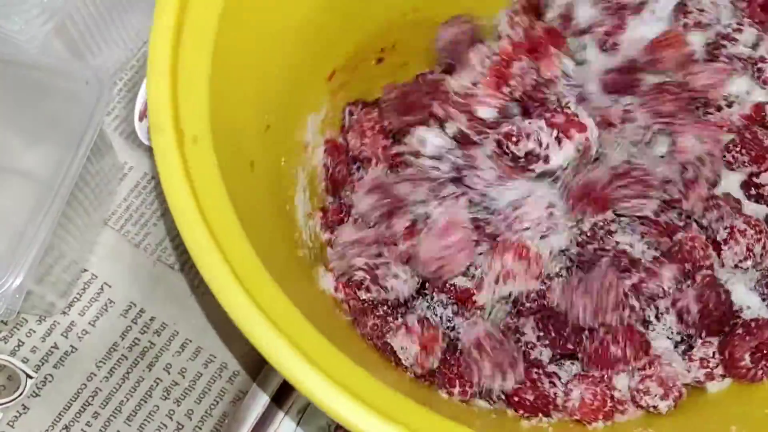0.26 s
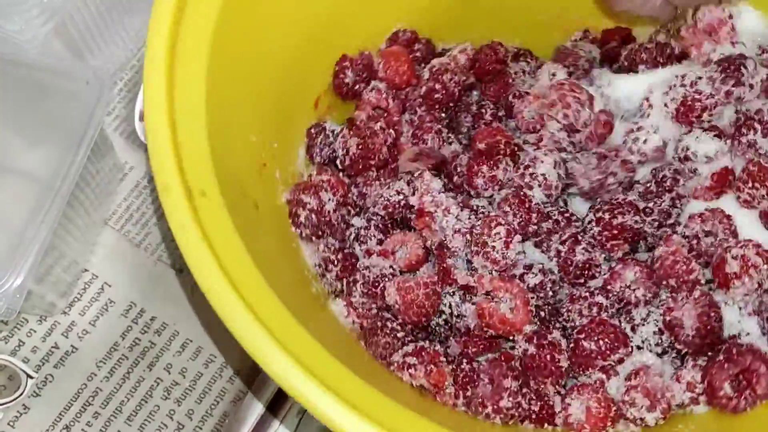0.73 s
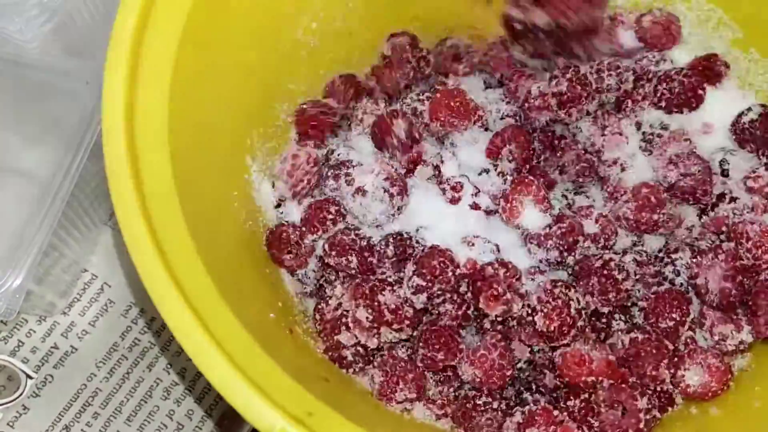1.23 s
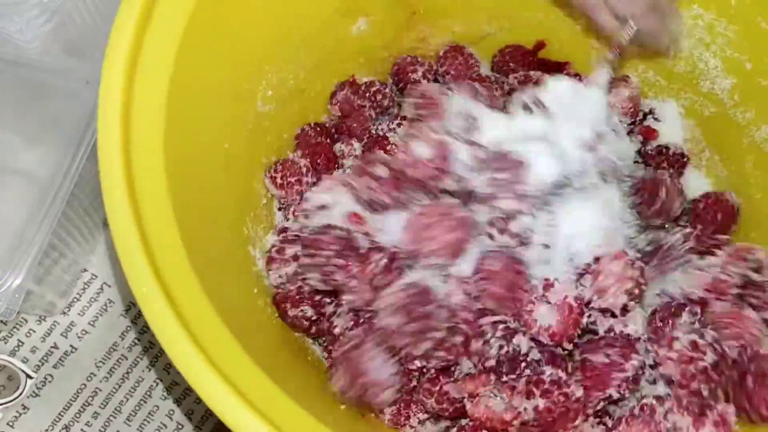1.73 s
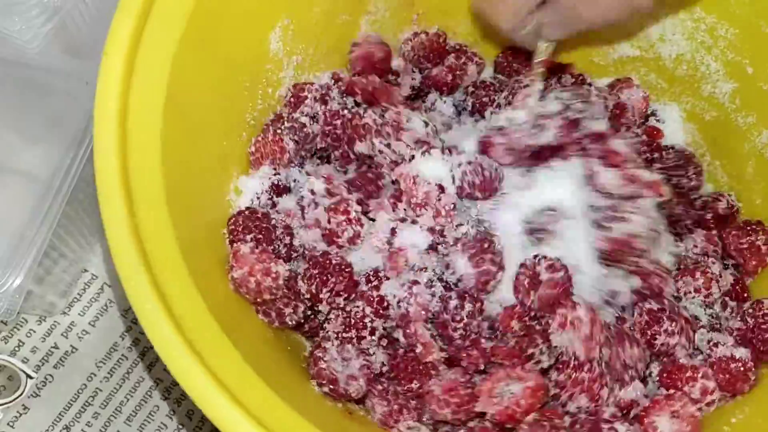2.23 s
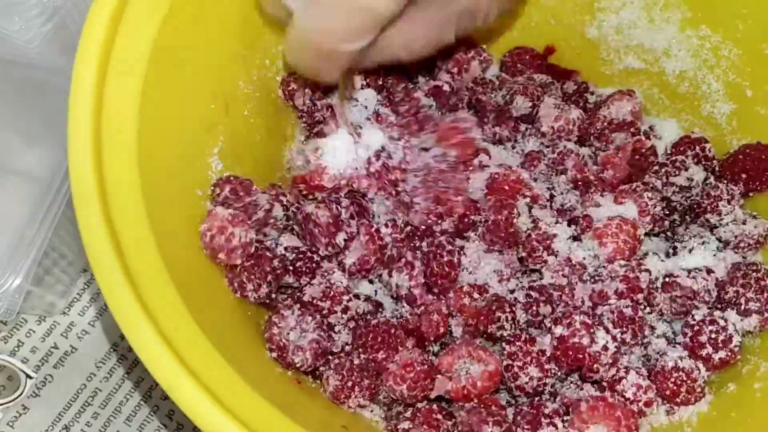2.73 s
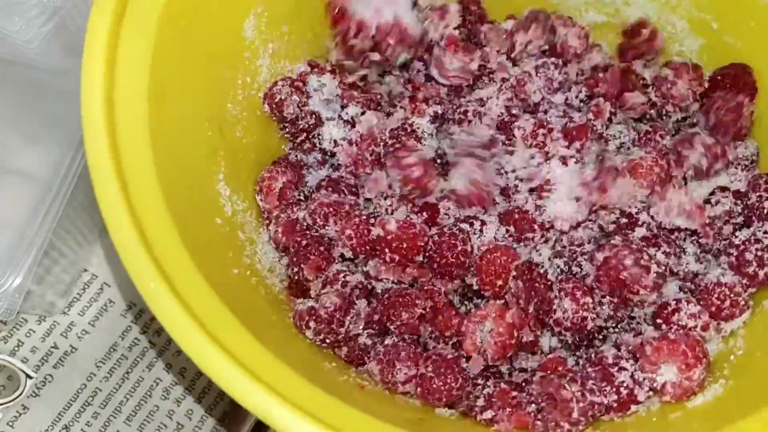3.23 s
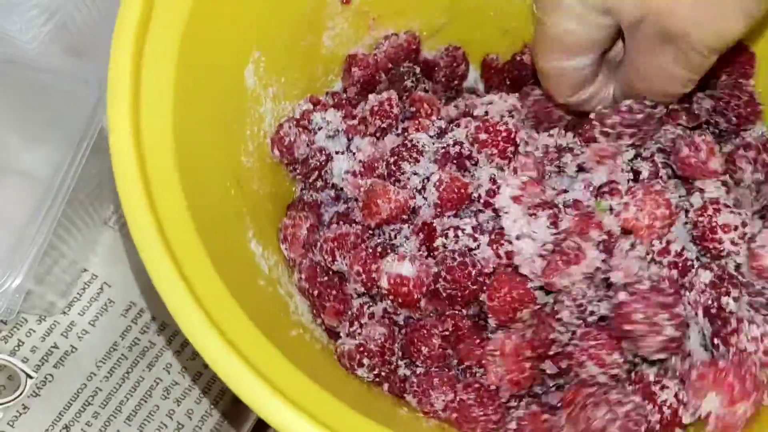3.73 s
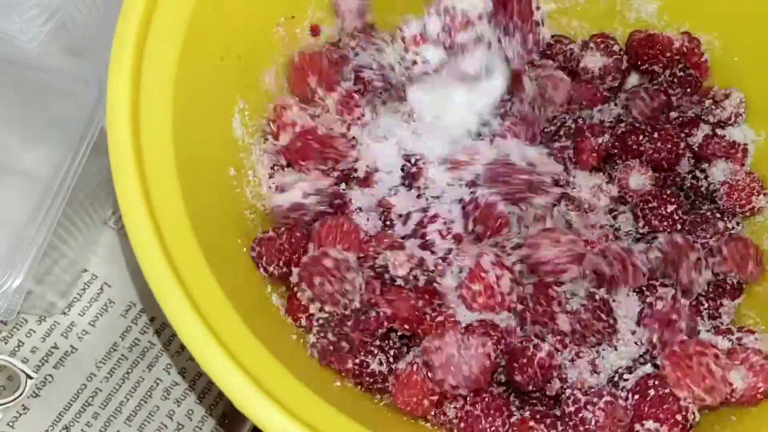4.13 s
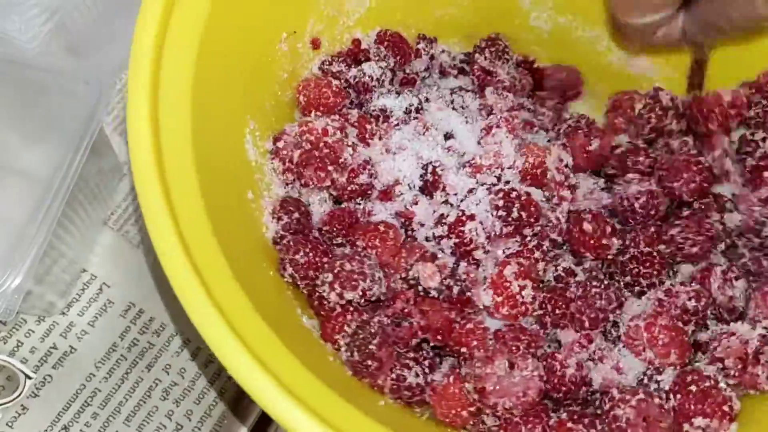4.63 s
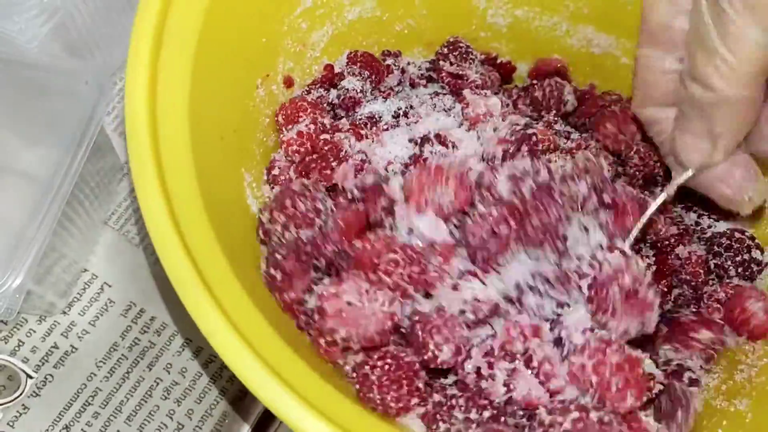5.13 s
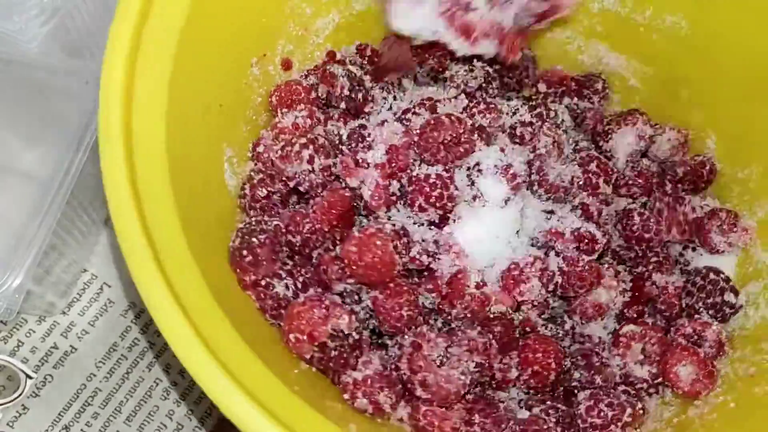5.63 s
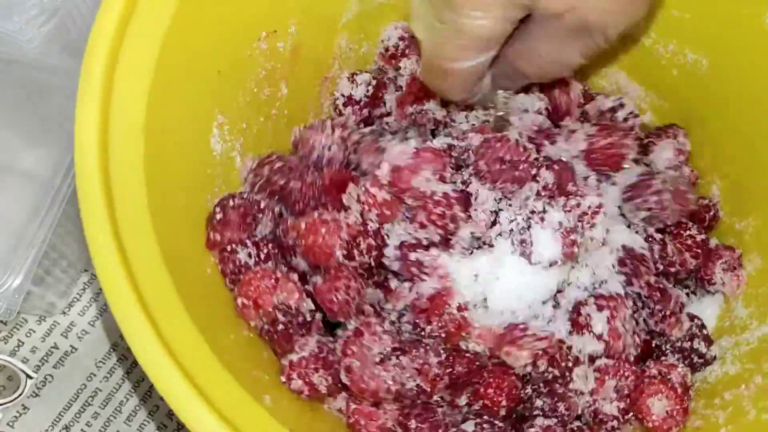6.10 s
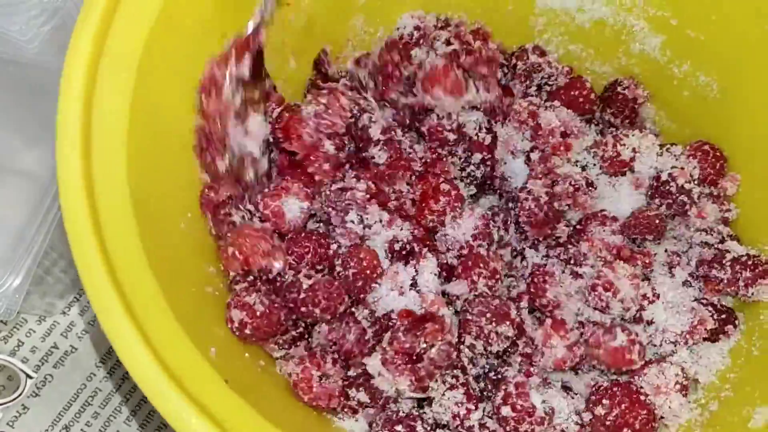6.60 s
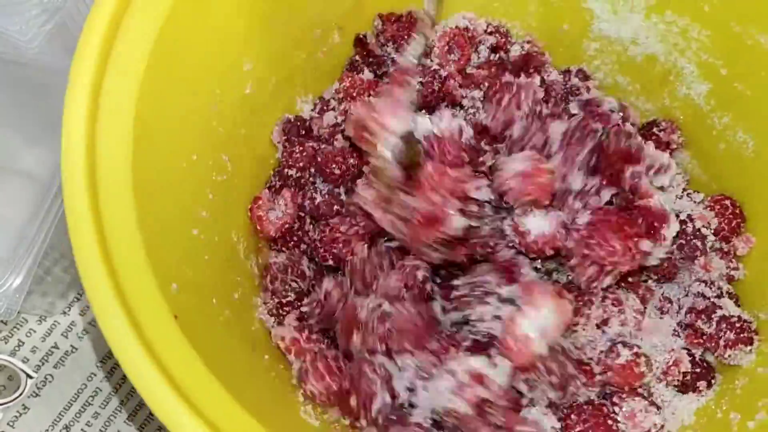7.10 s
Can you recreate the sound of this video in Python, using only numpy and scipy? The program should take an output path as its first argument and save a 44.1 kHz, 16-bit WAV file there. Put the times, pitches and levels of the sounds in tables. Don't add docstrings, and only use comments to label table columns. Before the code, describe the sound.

Close stereo sound of a spoon working through sugared berries in a plastic bowl. Strokes come unevenly: bright sandy hiss, soft moist rubbing, brittle crackles, brief drags along the wall. Heavier hollow knocks stand out at the start, early on and midway; a hard tap falls in between, and dense crunching comes late. Quieter gaps leave low kitchen air and a very short echo.

```python
import sys
import numpy as np
from scipy import signal
from scipy.fft import rfft, irfft, next_fast_len
from scipy.io import wavfile
from scipy.ndimage import uniform_filter1d

SR = 44100
rng = np.random.default_rng(int(sys.argv[2]) if len(sys.argv) > 2 else 0)


def gain_from_db(level_db):
    decades = np.asarray(level_db, float) / 20
    return 10 ** decades


def inscribe(sig):
    pcm = np.round(np.clip(np.atleast_2d(sig).T, -1, 1) * 32767)
    wavfile.write(sys.argv[1], SR, pcm.astype(np.int16))


N = 324425

# f/Hz, level/dB, time to fall 60 dB/s
BOWL_LOW = [
    (125.6, -6.5, 0.22),
    (203.1, -4, 0.33),
    (226.5, 6.5, 0.16),
]
# f/Hz, level/dB, time to fall 60 dB/s
BOWL_RIM = [
    (292, 3, 0.073),
    (341, -4.5, 0.089),
]
# f/Hz, level/dB, time to fall 60 dB/s
BOWL_WALL = [(376, -8.5, 0.046), (522, 4, 0.054), (621, -3, 0.12), (726, 2.5, 0.054), (864, -1.5, 0.11),
             (960.5, -1, 0.098), (1110, 5.5, 0.034), (1436, 11.5, 0.01)]
# f/Hz, level/dB, time to fall 60 dB/s
SPOON_NOTES = [
    (2196, 0, .024),
    (2600, -8, .016),
]

# f/Hz, level per Hz/dB
SUGAR_COLOUR = [(2060, -25), (3500, -7), (4690, -8.5), (6890, -6.5), (9050, 4), (10400, 0.5), (13000, -7.5),
                (14200, -11), (14600, -5), (15400, -60)]
# f/Hz, level per Hz/dB
RUB_COLOUR = [(530, -39), (900, -12), (1330, -7), (1450, -9), (1610, -3), (2220, -1.5), (3120, -7.5),
              (5500, -19), (7150, -21), (12100, -120)]
# f/Hz, level per Hz/dB
CRACK_COLOUR = [(3240, -19.5), (5500, -18), (7380, -6), (7940, -7), (8580, 1), (9680, -1.5), (13700, -10),
                (14300, -29), (15400, -51)]
# f/Hz, level per Hz/dB
CRUMBLE_COLOUR = [(700, -49), (1400, -3), (2500, -0.5), (4000, -1), (5800, -1), (8000, -33)]
# f/Hz, level per Hz/dB
ROOM_COLOUR = [(12, -20), (20, 10), (60, -4), (157, -11.5), (213, -6.5), (332, -16.5), (504, -12.5),
               (1370, -23), (2200, -14.5), (3250, -21), (6700, -20.5), (9100, -8), (13800, -18),
               (15400, -53)]
# f/Hz, likeness/0..1
ROOM_ALIKE = [(25, 0.23), (125, 0.5), (500, 0.66), (1500, 0.15)]
# f/Hz, left minus right/dB
PORT_TILT = [(60, -1), (130, -2), (290, 2.5), (640, 1.5), (1410, 0.5), (3090, 1), (6810, -4.5),
             (15000, 6.5)]

# t/s, peak/dB, wall patch f/Hz, whole-bowl level/dB, rim level/dB
THUDS = [(0.0, -11.5, 676, -29, -19), (0.079, -33, 630, -42, -44), (0.513, -45, 433, -47, -63),
         (0.717, -14.5, 696, -25, -25), (0.803, -31, 700, -37.5, -50), (1.256, -33.5, 460, -42, -37),
         (1.486, -26, 420, -26.5, -26.5), (2.223, -24, 770, -44, -33.5), (3.572, -14.5, 1135, -46, -26),
         (3.602, -26, 953, -41.5, -51), (4.224, -47, 500, -48, -55), (4.255, -42, 476, -56, -58),
         (4.288, -51, 520, -58, -64), (4.373, -30, 1260, -43.5, -46.5), (4.547, -30, 370, -37, -23.5),
         (4.782, -31.5, 504, -53, -47), (6.014, -25.5, 503, -38.5, -35.5), (7.329, -45, 457, -43, -53)]
# t/s, peak/dB, f/Hz of the
# wall patch or ping, left minus right/dB
TAPS = [(0.275, -38, 910, 3), (2.221, -11.5, 1730, 3.5), (2.2222, -15.5, 2200, -2), (2.227, -25, 740, -3),
        (2.259, -33.5, 755, 0.0), (3.616, -27, 965, -5), (3.632, -29, 970, 0), (3.638, -25.5, 930, 0),
        (3.653, -27, 900, 0.0), (3.688, -28, 725, -3), (3.699, -32, 840, 2), (3.734, -33, 705, -11),
        (4.531, -24, 1260, 6), (4.645, -29.5, 1430, -19), (4.686, -22.5, 880, -2), (5.118, -33, 1410, 5),
        (5.532, -48, 1440, 4), (5.939, -33, 1330, 26.5), (6.161, -26, 522, 1), (6.176, -24, 1290, -6),
        (6.1841, -19, 1190, -3), (6.885, -25, 906, 0), (6.893, -20, 3700, 0), (6.91, -36, 1800, 0.0),
        (6.92, -40, 1800, 0.0), (7.328, -29, 1670, 18), (7.33, -14, 6000, -5)]
# fullest t/s, sugar level/dB, berry rub over sugar/dB,
# swell/ms per 10 dB, fade/ms per 10 dB
SLIDES = [(.24, -38, -11.5, 90, 187), (.705, -30, -7.5, 124, 64), (1.05, -43.5, -15, 250, 112),
          (1.332, -25.5, -15, 65, 290), (1.63, -32.5, -6, 200, 155), (2.0, -39, -10, 108, 125),
          (2.494, -39.5, -14.5, 62, 87), (2.758, -32.5, -11, 68, 70), (2.973, -40, -6, 221, 46),
          (3.263, -43.5, -6, 152, 45), (3.437, -39, -10.5, 57, 218), (3.882, -35.5, -5.5, 232, 158),
          (4.25, -42.5, -10, 251, 117), (4.675, -25.5, -12.5, 55, 142), (4.99, -32, -6, 250, 215),
          (5.388, -43.5, -9, 300, 46), (5.542, -42.5, -2, 7, 12), (5.7, -41.5, -8.5, 59, 47),
          (5.862, -31, -7, 20, 167), (5.984, -24.5, -7, 64, 15), (6.14, -40, -2, 114, 126),
          (6.465, -42.5, -13, 116, 125), (6.719, -32, -11, 46, 139), (7.23, -47.5, -6, 400, 37)]
# t/s, sugar level/dB, berry rub level/dB, fade/ms per 10 dB
JOLTS = [(0.0, -25.5, -34.5, 67), (.513, -39, -53, 160), (0.77, -33.5, -39, 222), (1.257, -41, -50, 23),
         (1.487, -39, -53, 43), (2.082, -38, -42.5, 92), (2.221, -34.5, -31.5, 34), (3.57, -34, -37, 76),
         (4.374, -30.5, -43, 75), (4.527, -28.5, -35, 70), (5.104, -53, -37, 31), (5.841, -27.5, -43, 54),
         (6.881, -32.5, -35.5, 114), (7.329, -47, -69, 100), (7.35, -35, -59, 100)]
# firmest t/s, level/dB, swell/ms per 10 dB, fade/ms per 10 dB
SKIDS = [(0.0, -32, 10, 115), (.26, -50, 150, 200), (.513, -46, 0, 95), (.715, -34.5, 69, 56),
         (.8, -47, 64, 150), (1.063, -48.5, 200, 92), (1.36, -38.5, 75, 191), (1.486, -27, 7.5, 38),
         (1.6, -46, 100, 87), (2.222, -33.5, 14, 45), (2.36, -50, 55, 121), (2.758, -51.5, 61, 78),
         (2.93, -47.5, 76, 82), (3.575, -38, 9, 150), (3.7, -37, 118, 56), (4.371, -41.5, 9, 33),
         (4.53, -38, -1, 136), (4.669, -40, 132, 247), (4.99, -47.5, 301, 108), (5.86, -42, 12, 287),
         (5.986, -49, 50, 100), (6.17, -38, 112, 32), (6.885, -43.5, 82, 115)]
# t/s, peak/dB, left minus right/dB, f/Hz
SNAPS = [(0.0001, -13, -10, 8700), (0.5113, -6.5, -6, 9000), (0.535, -16, -4, 9300), (0.5384, -5, -6, 9000),
         (0.5432, -10, -1, 9400), (0.546, -16, -1, 9100), (0.675, -24, -5, 8700), (0.6843, -11, -10, 9000),
         (0.701, -18, -1, 8300), (0.7063, -29, 0, 7950), (0.7176, -14, -1, 7200), (1.2583, -5, 2, 9200),
         (1.2578, -6, 0, 9100), (1.311, -6, -2, 9300), (1.3135, -15, -4, 9400), (1.3906, -25, 4, 8000),
         (1.4131, -20, -3, 8500), (1.4787, -16, -5, 8750), (1.4877, -6, 7, 9700), (2.2214, -28, 5, 6400),
         (2.2256, -21, 1, 6500), (3.5735, -13.5, 5, 9500), (3.6003, -11, -3, 9100), (3.633, -20, -4, 8500),
         (4.3727, -8, 7, 8700), (4.378, -5, -5, 8000), (4.5306, -14, -2, 8900), (4.5438, -4.5, -7, 10400),
         (4.5456, -19, -6, 9200), (4.6365, -12, -2, 8900), (4.6786, -6, -10, 8800), (4.6868, -10, 0, 9500),
         (5.838, -17, 0, 9300), (5.839, -18, -5, 8800), (5.855, -15, -3, 9200), (5.8581, -12, -7, 9000),
         (5.8628, -4, -1, 8900), (5.873, -3, 4, 8500), (5.8877, -9, 4, 10200), (5.9147, -9.5, 2, 8600),
         (5.93, -15, 8, 9700), (5.939, -21, 3, 8800), (5.9535, -10, -3, 8900), (5.971, -26, 5, 9900),
         (6.006, -22, 4, 8700), (6.883, -7.5, -3, 8600), (6.885, -15, 3, 6840), (6.8927, -5.5, -5, 8500),
         (7.3295, -3.5, -6, 8400), (7.338, -8.5, -4, 8200)]
# t/s, level/dB, dull part over bright/dB, left minus right/dB, length/ms
CRACKS = [(0.0007, -10, -10, 3, 0.64), (0.5125, -2.5, -18, -5.5, 1.8), (0.5381, 1, -16, -4, 0.8),
          (0.7033, -10.5, -7.5, -13, 1.1), (0.719, -17, -6, 13, 1.4), (1.2571, 0, -14, -1, 2.6),
          (1.3134, -6, -14, -2.5, 4.6), (1.4896, -9, -10.5, 1, 3.3), (2.0381, -20.5, -26, -5, 3.6),
          (3.572, -10, -13, 5, 2.6), (3.601, -13, -9.5, 1, 1.9), (4.3749, -13, -10, -1, 1.7),
          (4.378, -9.5, -9.5, 3, 3.3), (4.53, -22, -8, 2, 2.8), (4.5465, -12.5, -10, 0.0, 3.5),
          (4.6368, -13, -7, 3, 2), (4.649, -17, -9, 6, 11), (5.8544, -18, -21, -5, 3.2),
          (5.8594, -8.5, -15, -3, 14), (5.872, -12, -24, -8, 5.3), (5.8883, -9.5, -12.5, 7, 3),
          (5.9413, -12, -19, -7, 2), (5.971, -9.5, -20, 6, 4.5), (6.886, -12, -1.5, -4, 2.9),
          (6.8935, -14, -12, -3, 3.2), (7.3306, -2, -40, -2.5, 1.3)]
# t/s, level/dB, left minus right/dB, length/ms
MORE_CRACKS = [(0.0107, -27, 4, 6.3), (0.5334, -15, -6, 1.5), (0.5427, -21, -6, 4.1), (0.5965, -23, -10, 2.5),
               (0.636, -16.5, 2, 1.4), (0.661, -19, -5, 1.7), (0.685, -19, -4, 1.3), (0.6754, -19, -12, 1.8),
               (0.707, -8, -3, 1.7), (1.267, -29, 4, 5.4), (1.297, -16, -6, 3.9), (1.322, -18, 0, 11),
               (1.333, -10.5, -8, 4), (1.3395, -19, -4, 3.3), (1.358, -17, 3, 7.7), (1.422, -29, -2, 2.5),
               (1.45, -17, -5, 5), (1.457, -16, -1, 3), (3.229, -32, 12, 1), (3.373, -29, -4, 4.4),
               (3.382, -28.5, 3, 3.8), (2.2225, -22, 10, 1.7), (2.2259, -25, -6, 1.9), (3.633, -22, 3, 4.1),
               (4.658, -14, 0.0, 9), (4.672, -14, 0.0, 3.4), (4.6823, -6, 3, 1.8), (4.6879, -12, -1, 5.3),
               (4.693, -16, -3, 1.5), (5.8386, -20.5, 1, 6), (5.8922, -8.5, 2.5, 4.2), (5.921, -15, 6, 3.3),
               (5.953, -19, 6, 2), (5.9775, -20, 2.5, 2.3), (5.9899, -23, 9, 27), (5.9953, -19, 0.0, 2.3),
               (6.0078, -17, 9, 3.3), (6.185, -21, -5, 2.6), (6.865, -18, -4, 3.2), (7.338, -11, 6, 0.92)]
# t/s, level/dB, left minus right/dB
CLINKS = [
    (0.0007, -27, -3),
    (0.5117, -15.5, -1),
    (0.718, -19.5, 1),
    (1.2578, -15, -1),
    (1.3133, -28.5, 10),
    (5.8547, -28, -1),
    (5.8874, -23.5, 2),
    (7.3293, -24.5, 2),
]

TAP_BOWL_DB, TAP_RIM_DB = -53, -44
THUD_PAN_DB = 0.5
JOLT_SWELL_MS = 8.8
SKID_UNDER_RUB_DB = -12.5
ROUND_TOP_DB = -1.5
SHARED = 0.21
SNAP_RING_MS, SNAP_SHATTER_MS = 0.15, 0.95
SNAP_SHARDS = 0.68
SNAP_LOW_HZ, SNAP_TOP_HZ = 3300, 13300
MORE_CRACKS_DULL_DB = -16
ROOM_DB = -50
KITCHEN_T60_S, KITCHEN_DB = 0.16, -15
LEFT_LAG_S = 0.00017
LAG_TOP_HZ, TOP_BLEND = 6200, 0.2
STEADY_TOP_HZ = 14600


def rms_one(x):
    return x / np.sqrt(np.mean(x ** 2) + 1e-20)


def at_hz(points, hz):
    table_hz, values = np.array(points)[:, 0], np.array(points)[:, 1]
    return np.interp(np.log(hz + 1), np.log(table_hz), values)


def colour(x, spectrum):
    log_gain = at_hz(spectrum, np.linspace(0, SR / 2, 1025)) * np.log(10) / 20
    cepstrum = irfft(log_gain)
    cepstrum = np.r_[cepstrum[0], 2 * cepstrum[1:1024], cepstrum[1024], np.zeros(1023)]
    pulse = irfft(np.exp(rfft(cepstrum)))
    pulse = pulse / np.linalg.norm(pulse)
    return signal.fftconvolve(x, pulse[None], axes=1)[:, :N]


def drift(rate):
    r = np.exp(-2 * np.pi * rate / SR)
    noise = rng.standard_normal(N + SR)
    wander = signal.lfilter([1], [1, -2 * r, r * r], noise)
    return rms_one(wander[SR:])


def ring(clicks, hz, t60):
    r, w = gain_from_db(-60 / (t60 * SR)), 2 * np.pi * hz / SR
    return signal.lfilter([0, np.sin(w)], [1, -2 * r * np.cos(w), r * r], clicks + 1e-18)


def grains(per_s, spread_db, shared):
    hits = rng.random((3, N)) < per_s / SR
    sizes = np.minimum(rng.exponential(1, (3, N)), 5)
    hits = hits * gain_from_db(spread_db * sizes)
    hits = hits * rng.choice([-1, 1], (3, N))
    shared = np.clip(shared, 0, 1)
    return rms_one(np.sqrt(shared) * hits[0] + np.sqrt(1 - shared) * hits[1:])


def sides(pan_db):
    return gain_from_db(np.multiply.outer([.5, -.5], pan_db))


def patchy(x, patch_db, hold, breadth, size=512):
    bins = signal.stft(x, nperseg=size)[2]
    field = rng.standard_normal(bins.shape[1:])
    field = uniform_filter1d(field, size=breadth, axis=0)
    field = uniform_filter1d(field, size=hold, axis=1)
    return signal.istft(bins * gain_from_db(patch_db * rms_one(field)), nperseg=size)[1][:, :N]


def knocks():
    blows = [(*row, THUD_PAN_DB) for row in THUDS]
    blows += [(s, db, hz, db + TAP_BOWL_DB, db + TAP_RIM_DB, pan_db) for s, db, hz, pan_db in TAPS]
    out, chance = np.zeros((2, N)), rng.standard_normal((len(blows), 13))
    t = np.arange(int(.4 * SR)) / SR
    contact = (t < .0007) * np.sin(np.pi * t / .0007) / 18
    swell = 1 - np.exp(-t / 0.0024)
    wall, bowl, rim = [np.array([gain_from_db(db) * ring(contact, hz, t60) for hz, db, t60 in modes])
                       for modes in (BOWL_WALL, BOWL_LOW, BOWL_RIM)]
    wall_hz = np.array(BOWL_WALL)[:, 0]
    signs = (-1) ** np.arange(len(wall))
    for (s, peak_db, hz, bowl_db, rim_db, pan_db), luck in zip(blows, chance):
        cycles = t * hz / 1.17
        blow = gain_from_db(peak_db - 2.5) * cycles * np.exp(1 - cycles) * np.sin(2 * np.pi * hz * t)
        off_db = -6 * np.abs(np.log2(wall_hz / hz))
        blow += (signs * gain_from_db(peak_db - 17 + off_db + 5.1 * luck[:8])) @ wall
        bowl_ring = gain_from_db(bowl_db - 3.0 + 2 * luck[8:11]) @ bowl
        rim_ring = gain_from_db(rim_db - 2 + 2 * luck[11:]) @ rim
        blow -= swell * (bowl_ring + rim_ring)
        i = round(max(s, 0) * SR)
        out[:, i:i + len(t)] += (sides(pan_db)[:, None] * blow)[:, :N - i]
    return signal.sosfilt(signal.butter(2, 90, "high", fs=SR, output="sos"), out)


def stirring():
    t, power, silent = np.arange(0, N + 32, 32) / SR, 1e-10, -100
    moves = [(s, [db, db + rub_db, db + rub_db + SKID_UNDER_RUB_DB], up, down)
             for s, db, rub_db, up, down in SLIDES]
    moves += [(s, [db, rub_db, silent], JOLT_SWELL_MS, down) for s, db, rub_db, down in JOLTS]
    moves += [(s, [silent, silent, db], up, down) for s, db, up, down in SKIDS]
    for s, levels_db, up, down in moves:
        ms_per_10_db = np.where(t < s, max(up, 2), max(down, 10))
        away_db = 10 * np.abs(t - s) * 1000 / ms_per_10_db
        fall_db = np.hypot(away_db, ROUND_TOP_DB) - ROUND_TOP_DB
        power = power + gain_from_db(2 * np.subtract.outer(levels_db, fall_db))
    return [np.interp(np.arange(N) / SR, t, 10 * np.log10(p)) for p in power]


def sugar(slide_db, rub_db):
    clumps = drift(20)
    hiss = colour(grains(9000, 2.4, SHARED), SUGAR_COLOUR)
    hiss = hiss * gain_from_db(slide_db + 1.0 * clumps + 0.28 * drift(150))
    rub = colour(grains(4000, 1.83, 0.077), RUB_COLOUR)
    rub = rub * gain_from_db(rub_db + 1.26 * clumps + 0.12 * drift(28))
    return patchy(hiss + rub, 3.0, hold=5, breadth=4)


def drag(drag_db):
    slips = grains(500, 2.1, 0.79)
    wall = sum(gain_from_db(db) * ring(slips, hz, 0.55 * t60) * (-1) ** k for k, (hz, db, t60) in enumerate(BOWL_WALL))
    low = sum(gain_from_db(db) * ring(slips, hz, t60) for hz, db, t60 in BOWL_LOW + BOWL_RIM)
    late = 260
    drag_db = np.r_[np.full(late, drag_db[0]), drag_db[:-late]] - 2
    return gain_from_db(drag_db) * (rms_one(wall) + gain_from_db(-7.5) * rms_one(low))


def room_tone():
    mid, side = rfft(rng.standard_normal((2, N)))
    hz = np.linspace(0, SR / 2, len(mid))
    alike = np.clip(at_hz(ROOM_ALIKE, hz), 0, 1)
    both = np.sqrt(1 + alike) * mid + np.sqrt(1 - alike) * side * [[1], [-1]]
    both = both * gain_from_db(at_hz(ROOM_COLOUR, hz))
    rumble = irfft(both * (hz < 160), N)
    air = irfft(both * (hz >= 160), N)
    return gain_from_db(ROOM_DB) * rms_one(rumble * gain_from_db(2.2 * drift(23.0)) + air * gain_from_db(0.12 * drift(8.1)))


def snaps():
    out, t = np.zeros((2, N + 300)), np.arange(200) / SR
    shards = rng.standard_normal((len(SNAPS), 2, len(t)))
    shards = shards * SNAP_SHARDS * np.exp(-1000 * t / SNAP_SHATTER_MS)
    first_break = t == 0
    for (s, peak_db, pan_db, hz), pushes in zip(SNAPS, shards + first_break):
        shard = np.exp(-1000 * t[:40] / SNAP_RING_MS) * np.sin(2 * np.pi * hz * t[:40])
        snap = signal.lfilter(shard, [1], pushes)
        snap /= np.abs(snap).max(axis=1, keepdims=True)
        out[:, round(s * SR) + np.arange(len(t))] += sides(pan_db)[:, None] * gain_from_db(peak_db - 1.5) * snap
    band = signal.butter(6, [SNAP_LOW_HZ, SNAP_TOP_HZ], "band", fs=SR, output="sos")
    return signal.sosfilt(band, out[:, :N])


def crunches():
    bright, dull = np.zeros((2, 2, N + SR))
    t = np.arange(-.01, .05, 1 / SR)
    crushes = CRACKS + [(s, db, MORE_CRACKS_DULL_DB, pan_db, ms) for s, db, pan_db, ms in MORE_CRACKS]
    for s, level_db, dull_db, pan_db, ms in crushes:
        at = round((s + t[0]) * SR) + np.arange(len(t))
        width = max(ms, .5) / 1000 * np.where(t < 0, .33, .62)
        tail = 0.21 * np.exp(-np.abs(t) / 0.0085) * (t > 0)
        burst = np.exp(-(t / width) ** 2) + tail
        burst = sides(pan_db)[:, None] * gain_from_db(level_db - 11) * burst
        bright[:, at] += burst
        dull[:, at] += gain_from_db(dull_db + 6.5) * burst
    cracks = colour(grains(8000, 3.3, .06) * bright[:, :N], CRACK_COLOUR)
    crumbling = colour(grains(6000, 5.0, 0.33) * dull[:, :N], CRUMBLE_COLOUR)
    return cracks + crumbling


def spoon():
    taps = np.zeros((2, N))
    for s, level_db, pan_db in CLINKS:
        at = np.abs(round(s * SR) - np.array([34, 30]))
        taps[[0, 1], at] += sides(pan_db) * gain_from_db(level_db)
    clink = sum(gain_from_db(db) * ring(taps, hz, t60) * (-1) ** k for k, (hz, db, t60) in enumerate(SPOON_NOTES))
    return signal.sosfilt(signal.butter(2, [1850, 2900], "band", fs=SR, output="sos"), clink)


def kitchen(x):
    t = np.arange(int(.5 * SR)) / SR
    tail = rng.standard_normal((2, len(t))) * gain_from_db(-60 * t / KITCHEN_T60_S) * (t > .004)
    tail = tail / np.linalg.norm(tail[0])
    tail = signal.sosfilt(signal.butter(2, [450, 9000], "band", fs=SR, output="sos"), tail)
    return gain_from_db(KITCHEN_DB) * signal.fftconvolve(x, tail, axes=1)[:, :N]


def ports(x):
    size = next_fast_len(N + 64)
    hz = np.linspace(0, SR / 2, size // 2 + 1)
    late = np.exp(-2j * np.pi * hz * LEFT_LAG_S * (hz < LAG_TOP_HZ))
    heard = rfft(x, size)
    heard = heard + np.clip(TOP_BLEND, 0, 1) * (hz >= LAG_TOP_HZ) * heard[::-1]
    tilt = sides(at_hz(PORT_TILT, hz))
    return irfft(heard * tilt * [late, np.ones_like(late)], size)[:, :N]


def scene():
    slide_db, rub_db, drag_db = stirring()
    steady = sugar(slide_db, rub_db) + drag(drag_db)
    crush = crunches()
    blows = knocks() + spoon()
    sharp = snaps()
    bowl = steady + blows + patchy(crush, 3.5, hold=3, breadth=3, size=128)
    top = signal.cheby2(18, 60, STEADY_TOP_HZ + 150, fs=SR, output="sos")
    soft_topped = signal.sosfilt(top, bowl + kitchen(bowl + sharp) + room_tone())
    return ports(sharp + soft_topped)


def low_pass(x):
    return signal.sosfilt(signal.butter(12, 15580, fs=SR, output="sos"), x)


def record(dry):
    mix = 1.2 * np.tanh(dry / 1.2)
    return low_pass(mix)


dry = scene()
out = record(dry)
inscribe(out)
```